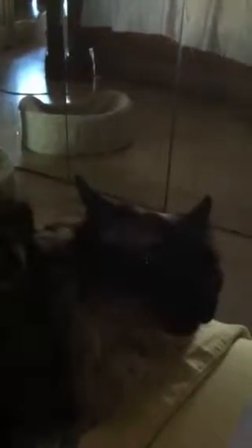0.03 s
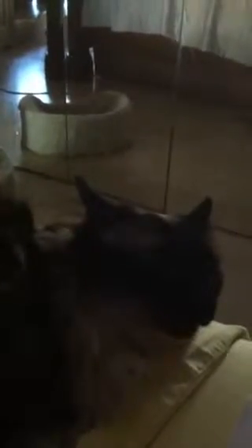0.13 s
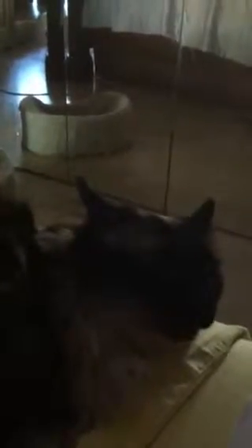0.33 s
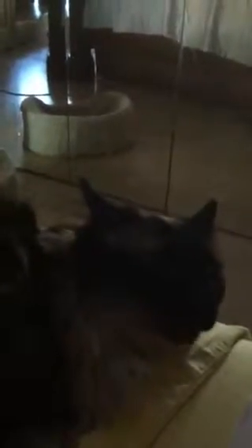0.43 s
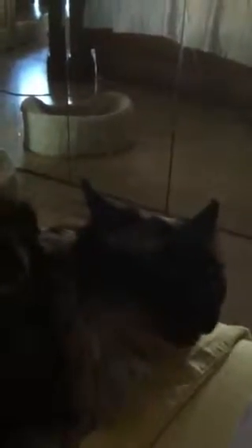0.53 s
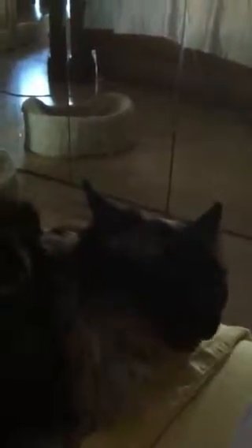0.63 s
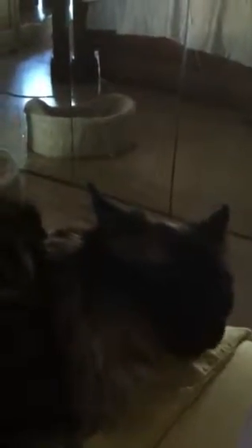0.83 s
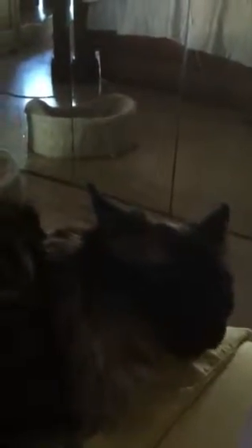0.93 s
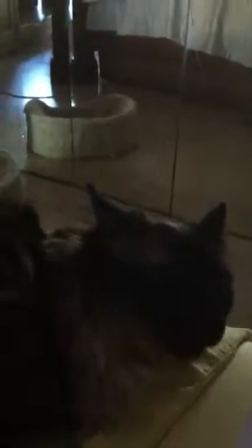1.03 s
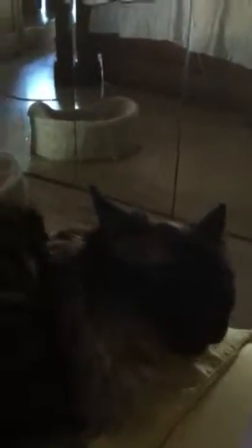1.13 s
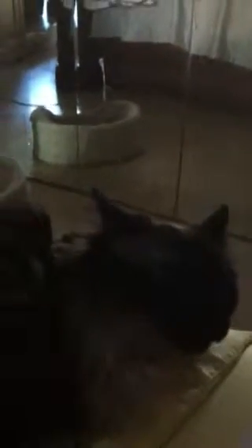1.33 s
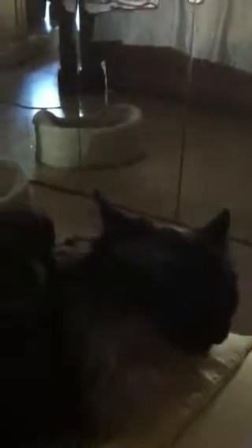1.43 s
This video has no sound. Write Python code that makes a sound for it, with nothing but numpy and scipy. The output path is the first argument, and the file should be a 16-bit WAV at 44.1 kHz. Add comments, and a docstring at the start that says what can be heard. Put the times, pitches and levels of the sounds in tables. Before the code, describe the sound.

A cat close to the microphone gives one rolling, chirruping purr that swells and climbs in pitch, just after two tiny lip clicks. A soft bump follows, over faint steady hiss in a quiet room.

```python
"""Faint steady hiss in a quiet room, two tiny lip clicks, then one rolling, chirruping purr from a cat
close to the microphone. Its larynx flaps open about 26 times a second: each opening makes a soft pop
and a wet tick, then lets out a very short, almost pure tone. The tones climb in pitch as the roll
swells. Half a second after the roll, something is nudged softly."""
import sys
import numpy as np
from scipy import signal
from scipy.fft import rfft, irfft
from scipy.io import wavfile

SR = 44100
rng = np.random.default_rng(int(sys.argv[2]) if len(sys.argv) > 2 else 0)


def int16_out(signal):
    """Quantize to a 16-bit WAV file."""
    q = np.round(np.clip(np.atleast_2d(signal).T, -1, 1) * 32767)
    wavfile.write(sys.argv[1], SR, q.astype(np.int16))


N = 66150

# colour of the room tone (frequency [Hz], relative level [dB])
HISS_COLOUR = [(15, -2), (38, -54.5), (60, -3.5), (85, -17), (125, 0), (250, -0.5), (370, -2.5), (490, -10),
               (700, -7.5), (1000, -14), (1300, -12.5), (2700, -15), (7500, -17), (11500, -15),
               (15500, -21)]
# steady tones in the background (frequency [Hz], rms level [dB])
HUM_TONES = [(166.5, -80), (243, -78), (990, -93.5)]
# mouth clicks before the roll (time [s], level [dB])
MOUTH_CLICKS = [(0.084, -62), (.1165, -66.5)]
# colour of clicks, ticks and air passing the throat (frequency [Hz], relative level [dB])
MOUTH_COLOUR = [(300, 5), (900, 6.5), (1500, -6), (2300, -13.5), (3000, -3.5), (4300, -23), (5300, -3.5),
                (5750, -8.5), (6250, 3.5), (6900, -10.5), (7700, -27), (9300, -10), (15500, -18)]
# openings of the larynx
# (time [s], tone length [s], tone level [dB], pitch [Hz], pop level [dB], tick level [dB])
LARYNX_OPENINGS = [(0.1619, 0.0056, -64, 840, -76, -57.5), (0.1981, 0.011, -47.5, 624, -65.5, -61.5),
                   (0.235, .011, -43.5, 737, -57, -56.5), (0.2717, 0.011, -42.5, 749, -53, -59),
                   (.3092, 0.011, -40.5, 780, -65, -61), (0.344, 0.013, -38, 809, -49.5, -59.5),
                   (0.3811, 0.013, -38, 796, -49.5, -61.5), (0.4203, .0105, -37, 824, -47.5, -59.5),
                   (0.455, 0.015, -39.5, 869, -47.5, -55), (0.4925, 0.015, -34.5, 795, -47, -61.5),
                   (0.529, 0.016, -37.5, 895, -46, -54.5), (0.5626, 0.023, -33, 778.5, -43.5, -57.5),
                   (0.6033, .018, -33, 773, -48, -58), (0.6421, 0.0218, -35, 901.6, -46, -55),
                   (0.6796, 0.026, -32, 788.4, -47.5, -58), (.7240, 0.015, -39, 985, -46.5, -55),
                   (0.7549, 0.028, -33, 821, -46.5, -57), (0.7977, 0.024, -33.5, 844.4, -43.5, -53.5),
                   (0.8398, 0.015, -38.5, 967, -47.5, -49.5), (.8797, .0140, -39, 990, -47.5, -49)]
# buzz of a tone at full strength (harmonic [number], level against the fundamental [dB])
BUZZ_HARMONICS = [(3, -36.5), (4, -28), (5, -30.5), (6, -36), (7, -49), (8, -37.5)]
# colour of air through the nose (frequency [Hz], relative level [dB])
NOSE_AIR_COLOUR = [(500, -52), (2000, 5), (6000, 6.5), (8000, -3.5), (11500, 5), (15500, -4)]
# early reflections from floor and walls (delay [s], level against the direct sound [dB])
REFLECTIONS = [(.0105, -20), (.0165, -27), (.0395, -23)]

FULL_DB = -33  # a tone at full strength
TICK_DECAY_S = 0.003


def undb(db):
    """Decibels to gain."""
    return 10 ** (np.asarray(db) / 20)


def noise(colour):
    """Noise of rms 1 shaped by (frequency [Hz], level [dB]) points."""
    hz, db = np.array(colour, float).T
    bins_hz = np.maximum(np.arange(N // 2 + 1) * SR / N, 1)
    gain = undb(np.interp(np.log(bins_hz), np.log(hz), db))
    shaped = irfft(rfft(rng.standard_normal(N)) * gain, N)
    return shaped / shaped.std()


def dull_noise(top_hz):
    """Low-passed noise of rms 1."""
    dull = signal.sosfilt(signal.butter(2, top_hz, fs=SR, output="sos"), rng.standard_normal(N))
    return dull / dull.std()


def fade(age, decay_s):
    """Sudden start at age 0, then exponential decay."""
    return (age >= 0) * np.exp(-np.maximum(age, 0) / decay_s)


def thud(age, hz, decay_s):
    """One damped resonance."""
    return np.sin(2 * np.pi * hz * age) * fade(age, decay_s)


def room_tone(t):
    """The bed under everything: steady hiss, low room noise and a faint hum."""
    hum = sum(np.sqrt(2) * undb(db) * np.sin(2 * np.pi * (hz * t + rng.random())) for hz, db in HUM_TONES)
    return undb(-68.5) * noise(HISS_COLOUR) + hum


def lips(t):
    """Tiny wet clicks near the microphone as the mouth gets ready."""
    envelope = sum(undb(db) * fade(t - start, TICK_DECAY_S) for start, db in MOUTH_CLICKS)
    return noise(MOUTH_COLOUR) * envelope


def purr(t):
    """The larynx pops and ticks open, sounds a tone with a little air riding on it, then ticks shut."""
    roll = np.zeros(N)
    waver = 1 + 0.012 * dull_noise(top_hz=500)
    air = noise(MOUTH_COLOUR)
    for start, length, tone_db, hz, pop_db, tick_db in LARYNX_OPENINGS:
        active = (t >= start) & (t < start + 0.05)
        age = t[active] - start
        throat_ring = undb(-8) * thud(age, hz, decay_s=0.00087)
        # doubled, since the pop has lost about half its height by its first crest
        pop = 2 * undb(pop_db) * (thud(age, hz=396, decay_s=0.001) + throat_ring)
        tone, envelope = chirp(age, length, tone_db, hz, waver[active])
        closing_tick = undb(tone_db - FULL_DB + 1) * fade(age - length, TICK_DECAY_S)
        ticks = undb(tick_db) * (fade(age, TICK_DECAY_S) + closing_tick)
        breath = undb(-28) * envelope
        roll[active] += tone + pop + air[active] * (ticks + breath)
    return roll


def chirp(age, length, db, hz, waver):
    """One short tone and its envelope: it scoops up, sags where it is strongest and buzzes there."""
    rest_hz, sag_hz, scoop_hz = 1028, 183.4, 356
    nasal_hz, nasal_width_hz = 1508, 280
    progress = np.clip(age / length, 0, 1)
    swell = np.abs(np.sin(np.pi * progress)) ** (length / 0.018) * (progress < 1)
    effort = undb(db - FULL_DB)
    drive = effort * swell
    # where it is weakly driven, the tone slides up toward the rest pitch
    slide = 0.68 * (rest_hz - hz) * (progress - 0.5) * np.maximum(1 - drive, 0)
    pitch = hz + slide + sag_hz * (effort - drive) - scoop_hz * fade(age, decay_s=0.001095)
    phase = 2 * np.pi * np.cumsum(pitch * waver) / SR
    # a nasal resonance favours the second harmonic
    nasal_gain = 1 / np.hypot(1, 2 * (2 * pitch - nasal_hz) / nasal_width_hz)
    octave = undb(-24) * nasal_gain * drive ** 1.06 * np.sin(2 * phase)
    harmonics = sum(undb(level_db) * np.sin(k * phase) for k, level_db in BUZZ_HARMONICS)
    buzz = drive ** 3.3 * harmonics  # fades much faster than the tone
    return undb(FULL_DB) * (drive * np.sin(phase) + octave + buzz), undb(FULL_DB) * drive


def nose(t, peak_s=0.73, spread_s=0.15):
    """A thin hiss of air swells under the strongest part of the roll."""
    swell = np.exp(-((t - peak_s) / spread_s) ** 2)
    return undb(-70) * swell * noise(NOSE_AIR_COLOUR)


def bump(t, start_s=1.4302):
    """Something in the room is nudged softly."""
    return undb(-49.5) * thud(t - start_s, hz=335, decay_s=0.0027)


def room(direct, t):
    """Well below the close sound: a few reflections, a short dull tail and one faint lingering ring."""
    tail_t60_s, tail_top_hz = 0.52, 4750
    ring_hz, ring_t60_s = 990, 0.4
    tail = dull_noise(tail_top_hz) * np.exp(-np.log(1000) * t / tail_t60_s) * (t > REFLECTIONS[0][0])
    tail *= undb(-25) * np.sqrt(2 * tail_top_hz / SR / np.sum(tail ** 2))
    ring_decay_s = ring_t60_s / np.log(1000)
    ring = undb(-13) * 2 / (ring_decay_s * SR) * thud(t, ring_hz, ring_decay_s)
    response = tail + ring
    for delay_s, db in REFLECTIONS:
        response[int(delay_s * SR)] += undb(db)
    return direct + signal.fftconvolve(direct, response)[:N]


def scene():
    """The cat at close range in its room, in mono, on a small microphone that loses the bass."""
    t = np.arange(N) / SR
    at_microphone = room(purr(t) + nose(t) + lips(t) + bump(t), t)
    low_cut = signal.butter(5, 142, "high", fs=SR, output="sos")
    return (signal.sosfilt(low_cut, at_microphone) + room_tone(t))[None]


def record(dry):
    """The recorder cuts the top steeply above 15.7 kHz."""
    return signal.sosfilt(signal.ellip(10, 0.1, 70, 15700, fs=SR, output="sos"), dry)


dry = scene()
out = record(dry)
int16_out(out)
```